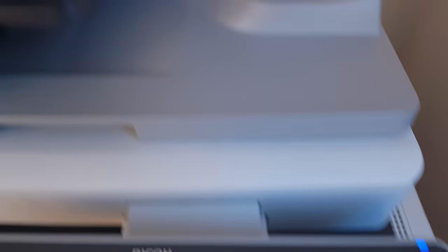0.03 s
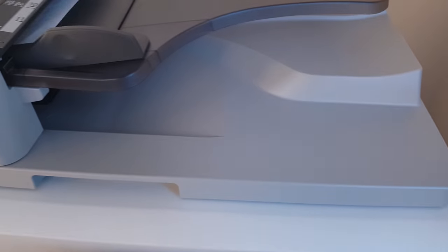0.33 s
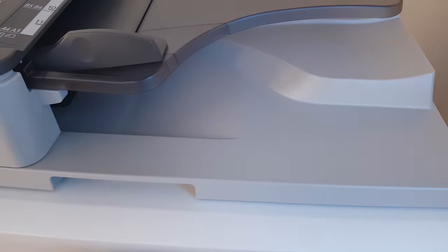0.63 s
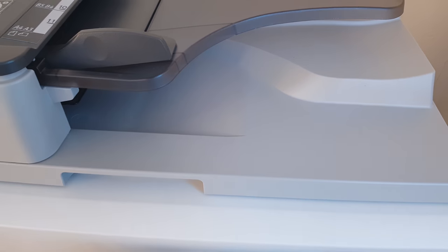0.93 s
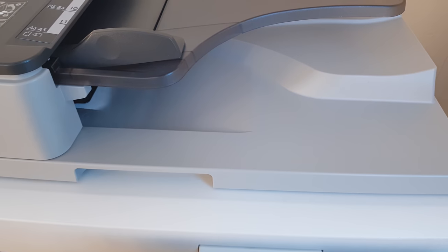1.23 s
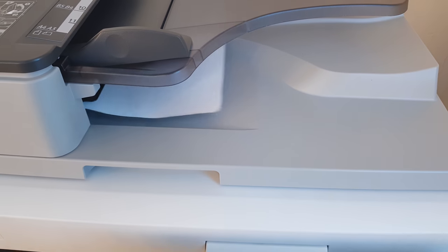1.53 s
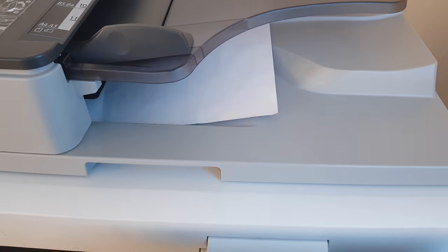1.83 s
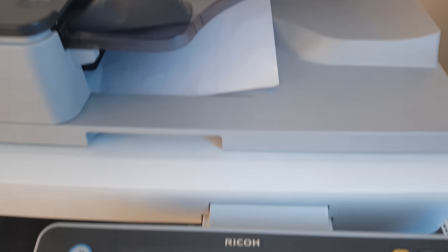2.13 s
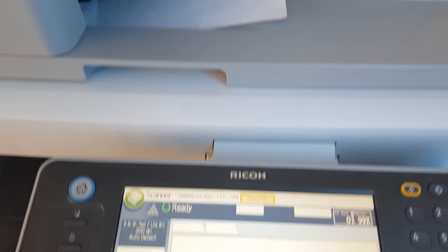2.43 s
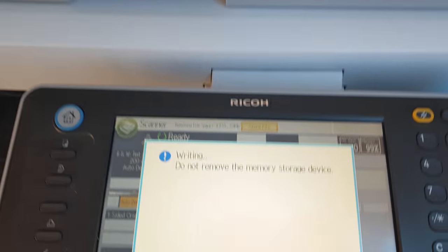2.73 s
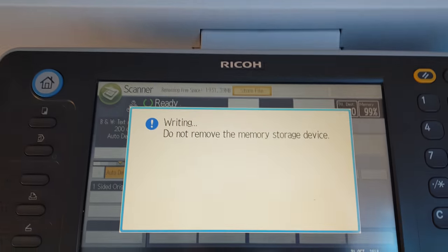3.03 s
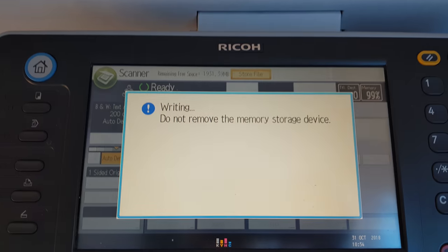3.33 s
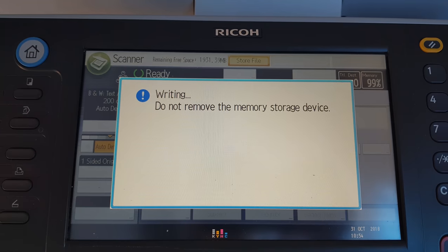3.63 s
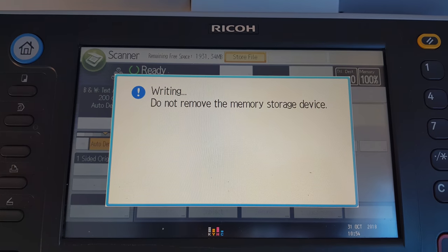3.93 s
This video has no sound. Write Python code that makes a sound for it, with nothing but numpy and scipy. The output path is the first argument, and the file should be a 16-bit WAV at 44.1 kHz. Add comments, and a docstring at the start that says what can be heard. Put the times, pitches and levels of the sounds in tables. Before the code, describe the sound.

A copier whirs and clicks, pauses briefly, then clunks and draws one sheet through with a papery hiss. The sheet flaps into the tray, leaving a low fan hum and faint pulsing buzz, close by in a small office.

```python
"""A whirring, clicking paper feed: a copier pulls in one sheet, pauses, scans it and drops it in the tray.
Motors hum, gear teeth and clutches excite the resonances of a plastic housing, and latches snap and ring.
Friction makes the sheet hiss and a roller squeak; the sheet's edge flaps as it comes free.
Underneath, in a small office, a cooling fan runs and the electronics buzz on and off."""
import sys
import numpy as np
from scipy import signal
from scipy.fft import rfft, irfft
from scipy.io import wavfile
from scipy.ndimage import uniform_filter1d

SR = 44100
rng = np.random.default_rng(int(sys.argv[2]) if len(sys.argv) > 2 else 0)


def pcm_store(signal):
    """Save signal as 16-bit PCM."""
    levels = np.round(np.clip(np.atleast_2d(signal), -1, 1) * 32767)
    wavfile.write(sys.argv[1], SR, levels.astype(np.int16).T)


N = 176400
T = np.arange(N) / SR


def amp(db):
    """Amplitude ratio of a level in decibels."""
    return 10 ** (np.asarray(db) / 20)


def unit(x):
    """Normalisation to an rms of 1."""
    return x / np.sqrt(np.mean(x ** 2))


def over_hz(points):
    """Interpolation of (frequency_hz, value) rows over all FFT bins, on a logarithmic frequency axis."""
    hz, value = np.array(points).T
    return np.interp(np.log(np.arange(N // 2 + 1) * SR / N + 1), np.log(hz), value)


def over_time(rows, column):
    """Linear interpolation of one column against the times in the first."""
    rows = np.array(rows)
    return np.interp(T, rows[:, 0], rows[:, column])


def convolve(x, response):
    """Convolution with an impulse response, one row per channel."""
    return signal.fftconvolve(np.atleast_2d(x), response, axes=1)[:, :N]


def colour(x, spectrum):
    """Minimum-phase filtering to a spectral shape, preserving the power of white noise."""
    cepstrum = irfft(np.log(unit(amp(over_hz(spectrum)))), N)
    cepstrum[1:N // 2] *= 2  # folding onto positive time makes the filter causal
    cepstrum[N // 2 + 1:] = 0
    response = irfft(np.exp(rfft(cepstrum)), N)
    return convolve(x, response[None, :N // 40])


def pair(x):
    """Spatial coherence: two independent signals blend into left and right channels alike in the bass."""
    # frequency_hz, correlation
    coherence = [(60, 1), (290, 0.8), (640, 0.8), (1400, -0.0653), (4000, 0), (15000, 0)]
    alike = np.clip(over_hz(coherence), -.99, .99)
    mid, side = rfft(x) * np.sqrt(np.array([1 + alike, 1 - alike]) / 2)
    return irfft(np.array([mid + side, mid - side]), N)


def noise():
    """Partly coherent stereo white noise."""
    return pair(rng.standard_normal((2, N)))


def wander(rate_hz):
    """Random fluctuation of rms 1, linear between rate_hz points a second."""
    knots = rng.standard_normal(N // 100)
    return unit(np.interp(T * rate_hz, np.arange(len(knots)), knots))


def burst(peak_s, rise_s, decay_s):
    """Exponential growth and decay about a peak, each with its own time constant."""
    time_constants = np.maximum((peak_s - T) / rise_s, (T - peak_s) / decay_s)
    return np.exp(-np.minimum(time_constants, 20))


def gate(start_s, end_s, ramp_s):
    """Trapezoidal envelope between two times."""
    return np.clip(np.minimum(T - start_s, end_s - T) / ramp_s + .5, 0, 1)


def ringing(modes):
    """Modal superposition: an impulse response as a sum of damped sinusoids."""
    t = T[:N // 10]
    return sum(amp(db - 60 * t / t60) * np.sin(2 * np.pi * hz * t) for hz, db, t60 in modes)[None]


def tone(hz, wow, flutter_db, rate_hz):
    """A sinusoid under random modulation of frequency (wow, an rms fraction) and level."""
    pitch_hz = hz * (1 + wow * wander(rate_hz))
    phase = 2 * np.pi * np.cumsum(pitch_hz) / SR
    return np.sqrt(2) * np.sin(phase) * amp(flutter_db * wander(rate_hz))


def office(x):
    """Reverberation: wall reflections add a short, exponentially decaying tail to the direct sound."""
    t60_s, delay_s, tail_db = 0.22, 0.0034, -11
    t = T[:N // 5]
    tail = rng.standard_normal((2, len(t))) * np.exp(-np.log(1000) * t / t60_s) * (t > delay_s)
    reflections = convolve(x, tail / np.linalg.norm(tail[0]))
    return x + amp(tail_db) * pair(reflections)


def fan():
    """Broadband airflow noise, with wavering blade and motor tones and a thin bearing whir."""
    # frequency_hz, relative_density_db
    air_spectrum = [(15, -39.5), (28, -11.5), (60, -5.5), (100, -17), (135, -14.5), (170, -10), (250, -7),
                    (340, -11), (450, -16.5), (780, -21.5), (1080, -14), (1350, -18.5), (1560, -24.5),
                    (1760, -40), (2150, -45.5), (2950, -35), (4000, -43.5), (4950, -37.5), (6500, -44),
                    (9000, -50.5), (16000, -46.5)]
    # pitch_hz, level_db
    rotor_tones = [(232, -58.5), (290.5, -61.5), (608, -69.5), (1039, -68.5)]
    air_db, left_minus_right_db = -48.5, 0.23
    air = amp(air_db) * unit(irfft(rfft(noise()) * amp(over_hz(air_spectrum)), N))
    tones = sum(amp(db) * tone(hz, wow=0.01016, flutter_db=4, rate_hz=14) for hz, db in rotor_tones)
    bearing = amp(-82.5) * tone(hz=4880, wow=0.0097, flutter_db=2.5, rate_hz=300)
    balance = amp(np.array([[1], [-1]]) * left_minus_right_db / 2)
    return (air + tones + bearing) * balance


def mains_buzz():
    """A periodic train of noise spikes is heard as a buzz; mixed with hiss, it cycles on and off."""
    # frequency_hz, relative_gain_db
    buzz_spectrum = [(2500, -20), (4000, -3), (5500, 2), (6800, -2.5), (7250, 6.5), (7800, -1.5),
                     (8500, -10), (9550, -3.5), (10400, -14.5), (11200, -5), (11800, -11.5), (12900, -7),
                     (13400, -16), (16000, -20.5)]
    buzz_hz, buzz_db, spike_decay_s, hiss_over_spikes_db = 100, -63.5, .005, 0.5
    start_s, period_s, on_s = .015, .4, .19
    spike = rng.standard_normal((2, N // 100)) * np.exp(-T[:N // 100] / spike_decay_s)
    pulses = np.diff(np.floor(T * buzz_hz), prepend=0)
    spikes = unit(convolve(pulses, spike))
    buzz = unit(colour(spikes + amp(hiss_over_spikes_db) * noise(), buzz_spectrum))
    switched_on = uniform_filter1d(1. * ((T - start_s) % period_s < on_s), size=1000)
    return amp(buzz_db) * switched_on * buzz


def coil_whine():
    """Vibrating coils radiate faint high tones, each swelling and fading in a Gaussian envelope."""
    # peak_s, half_length_s, pitch_hz, level_db
    whines = [(.6, .18, 3620, -68), (2.123, 0.073, 3670, -70.5), (2.575, 0.24, 3620, -70.5),
              (2.886, .07, 3664, -72.5)]
    sound = np.zeros(N)
    for peak_s, half_length_s, hz, db in whines:
        swell = np.exp(-((T - peak_s) / half_length_s) ** 2)
        sound += amp(db) * swell * tone(hz, wow=0.0022, flutter_db=2.5, rate_hz=150)
    return sound


def motors():
    """Periodic forcing: stepper motors hum at their own pitches during each stage of the feed."""
    # start_s, end_s, pitch_hz, level_db
    runs = [(-.05, 0.162, 149, -41), (-.05, 0.187, 665, -46.5), (0.28, 0.337, 354.4, -37.5),
            (0.381, 0.477, 364, -36), (0.837, 1.057, 282.5, -33), (.84, 0.997, 192, -45.5),
            (0.962, 1.148, 460.7, -37.5), (1.055, 1.988, 287.5, -45.5), (1.385, 1.443, 379, -43.5),
            (1.723, 1.782, 290, -39), (1.891, 1.95, 379, -40.5), (1.978, 2.134, 208, -47.5)]
    return sum(amp(db) * gate(start, end, ramp_s=0.01) * tone(hz, wow=.008, flutter_db=2.2, rate_hz=37)
               for start, end, hz, db in runs)


def gears():
    """Impact noise: teeth strike at random, so the housing rumbles and the wheels chatter."""
    # time_s, relative_level_db
    drive = [(0, -36.5), (.26, -37.5), (.40, -33.5), (.49, -32), (.53, -46), (.825, -50), (.845, -36),
             (1.15, -34), (1.22, -38.5), (1.41, -41), (1.48, -44), (1.71, -41), (1.745, -35.5), (1.84, -40),
             (1.92, -40.5), (2.0, -41), (2.14, -56), (2.3, -69.5)]
    # frequency_hz, relative_gain_db (both tables)
    rumble_spectrum = [(20, -29), (50, -16), (110, -20), (170, -6.5), (300, -6.5), (450, -2), (570, -13),
                       (900, -25.5), (2000, -65.5)]
    chatter_spectrum = [(300, -19), (550, -1.5), (760, 3), (950, -3.5), (1300, -4), (1550, -12),
                        (2500, -24.5), (6000, -38.5)]
    strikes_per_s, scatter_db, gain_db = 900, 1.5, -1.5
    strikes = (rng.random(N) < strikes_per_s / SR) * amp(scatter_db * rng.standard_normal(N))
    polarity = np.sign(rng.standard_normal((2, N)))
    teeth = unit(pair(strikes * polarity) + .1 * noise()) * amp(over_time(drive, column=1))
    return amp(gain_db) * (colour(teeth, rumble_spectrum) + colour(teeth, chatter_spectrum))


def clutch_thumps():
    """Impulse excitation: soft blows from clutches and rollers ring the low modes of the housing."""
    # start_s, peak_db
    thumps = [(.188, -24.5), (0.447, -25), (0.488, -20), (0.8367, -19.5), (0.851, -25), (0.864, -23),
              (0.878, -13.5), (0.8816, -14), (.919, -20), (.969, -18), (1.033, -27.5), (1.113, -22.5),
              (1.251, -22), (1.2597, -23), (1.2632, -25.5), (1.731, -23.5), (1.764, -28)]
    # frequency_hz, relative_level_db, t60_s
    housing_modes = [(194.5, -17, 0.067), (296, 1, 0.041), (351, 5, 0.021), (471, -16.5, 0.037),
                     (729, -13, 0.045)]
    rise_s, cutoff_hz = .0012, 149  # the housing radiates little below the cutoff
    blows = np.zeros(N)
    for start_s, db in thumps:
        blows[int(start_s * SR)] += amp(db)
    body = ringing(housing_modes) * (1 - np.exp(-T[:N // 10] / rise_s))
    body = signal.sosfilt(signal.butter(2, cutoff_hz, "high", fs=SR, output="sos"), body)
    return convolve(blows, body / np.abs(body).max())


def latch_snaps():
    """Contact transients: each brief rattle cracks, excites a latch's modes and knocks the housing."""
    # peak_s, crack_db, rise_s, ring_db, ring_hz, knock_db
    snaps = [(0.129, -12.5, 0.0016, -18.5, 5000, -25), (0.1407, -36, 0.0006, -20, 2370, -29.5),
             (0.196, -33, 0.0057, -40, 3670, -25), (0.3763, -16, 0.0018, -11.5, 3684, -37),
             (.482, -43, 0.0026, -33, 3730, -34.5), (0.849, -47, 0.0012, -36, 3960, -32.5),
             (0.902, -39.5, 0.003, -27, 3760, -29), (1.0238, -31, 0.00085, -26, 4250, -33.5),
             (1.0421, -14, 0.00042, -15, 7100, -25), (1.0773, -25.5, 0.0011, -33, 7100, -35.5),
             (1.124, -38, 0.00083, -48, 3550, -26), (1.193, -43, 0.0014, -28, 4310, -33.5),
             (1.253, -36, 0.0012, -46, 3760, -33), (1.374, -34.5, 0.0013, -35, 2330, -30),
             (1.498, -42, 0.0023, -33, 3810, -36), (1.731, -48, 0.0023, -48, 3150, -32.5),
             (1.802, -33, 0.0028, -26, 3720, -33.5), (1.901, -36, 0.0033, -45, 3720, -27)]
    # ratio_to_ring_pitch, relative_level_db, t60_s
    latch_modes = [(.8, -6, .04), (1, 2, .04), (1.075, -11, .08), (1.16, 7, .003), (1.6, -7.5, .038)]
    # frequency_hz, relative_gain_db (both tables)
    crack_spectrum = [(600, -11), (1500, -8), (2800, -1.5), (4200, 1), (5500, 0.5), (7000, -4.5),
                      (10000, -10), (16000, -11.5)]
    knock_spectrum = [(100, -21), (250, -6), (700, -6.5), (1200, -4), (1900, -13), (3500, -13.5),
                      (9000, -44.5)]
    crack_envelope, knock_envelope = np.zeros((2, N))
    contacts, rings = noise(), np.zeros((2, N))
    for peak_s, crack_db, rise_s, ring_db, ring_hz, knock_db in snaps:
        crack_envelope += amp(crack_db) * burst(peak_s, rise_s, decay_s=0.0042)
        knock_envelope += amp(knock_db) * burst(peak_s, rise_s, decay_s=0.014)
        near = slice(max(int((peak_s - .03) * SR), 0), int((peak_s + .15) * SR))
        latch = ringing([(ring_hz * ratio, db, t60) for ratio, db, t60 in latch_modes])
        force = amp(ring_db) * burst(peak_s, rise_s, decay_s=0.0035)[near] * contacts[:, near]
        rings[:, near] += convolve(force, latch / np.linalg.norm(latch))[:, :force.shape[1]]
    cracks = colour(crack_envelope * noise(), crack_spectrum)
    knocks = colour(knock_envelope * noise(), knock_spectrum)
    return cracks + rings + knocks


def roller_squeak():
    """Friction-induced vibration: a roller sings on the sheet, skipping up at a jolt and on release."""
    start_s, jolt_s, end_s = 1.40, 1.502, 1.669
    pitch_hz, level_db, skip_fraction, skip_s = 2860, -51, 0.085, 0.0042
    skips = burst(jolt_s, skip_s, skip_s) + burst(end_s, skip_s, skip_s)
    squeak = tone(pitch_hz * (1 + skip_fraction * skips), wow=.002, flutter_db=1.5, rate_hz=250)
    return amp(level_db) * gate(start_s, end_s, ramp_s=0.014) * squeak


def paper_slide():
    """Sliding friction: the sheet rubs over rollers and guides, making a flickering broadband noise."""
    # time_s, relative_rub_db, relative_hiss_db
    slide = [(0, -35.5, -36.5), (.11, -36.5, -46.5), (.24, -43, -55.5), (.31, -37.5, -38), (.36, -39, -47),
             (.48, -39.5, -51.5), (.53, -58, -68), (.72, -67, -76), (.83, -55.5, -84), (.93, -38.5, -46.5),
             (1.10, -36.5, -47), (1.36, -43.5, -47), (1.43, -47.5, -51.5), (1.71, -46, -54),
             (1.78, -53.5, -80), (1.85, -46, -70), (1.88, -41, -38), (1.92, -46, -38), (2.02, -42, -73),
             (2.11, -59.5, -61), (2.3, -77.5, -89)]
    # frequency_hz, relative_gain_db (both tables)
    rub_spectrum = [(700, -19.5), (1600, -2), (2400, -2.5), (3500, -2.5), (4900, -0.5), (6000, -8.5),
                    (8000, -11.5), (11000, -24.5), (16000, -36.5)]
    hiss_spectrum = [(3000, -33.5), (6500, -1.5), (8500, -7.5), (11000, -3.5), (13500, -8.5), (16000, -7.5)]
    rub_gain_db, hiss_gain_db, flicker_db = -1, -2.5, 1.7
    grain = amp(flicker_db * wander(rate_hz=120))
    rub = colour(noise() * grain * amp(over_time(slide, column=1) + rub_gain_db), rub_spectrum)
    hiss = colour(noise() * grain * amp(over_time(slide, column=2) + hiss_gain_db), hiss_spectrum)
    return rub + hiss


def paper_flaps():
    """Damped transients: the sheet's edge flicks free, slaps into the tray and flutters."""
    # peak_s, level_db
    flaps = [(1.8566, -26.5), (1.888, -20), (1.897, -36), (1.907, -28.5), (1.92, -29), (1.933, -33),
             (1.942, -38), (1.964, -33), (1.986, -34.5), (2.011, -32.5), (2.032, -37)]
    # frequency_hz, relative_gain_db
    flap_spectrum = [(500, -10), (1500, -8.5), (3200, -1.5), (4400, 5), (6500, 0), (10500, -5.5),
                     (12500, -19), (16000, -18)]
    envelope = sum(amp(db) * burst(peak_s, rise_s=0.0011, decay_s=0.0064) for peak_s, db in flaps)
    return colour(noise() * envelope, flap_spectrum)


def scene():
    """Superposition: the feeder, leaning right around 4-6 kHz, sounds over the fan and electronics."""
    # frequency_hz, left_minus_right_db
    balance = [(60, 1.5), (250, 1.5), (700, 3), (1300, -1.5), (2400, 3.5), (4400, -6.5), (6200, -6.5),
               (8100, 2), (12000, -1)]
    feeder = office(gears() + latch_snaps() + paper_slide() + paper_flaps())
    feeder = feeder + clutch_thumps() + motors() + roller_squeak()
    lean_db = over_hz(balance) / 2
    feeder = irfft(rfft(feeder) * amp(np.array([lean_db, -lean_db])), N)
    return feeder + fan() + office(mains_buzz()) + coil_whine()


def record(dry):
    """Band limiting: a steep elliptic low-pass removes the highest treble."""
    cutoff_hz = 15900
    return signal.sosfilt(signal.ellip(10, .2, 70, cutoff_hz, fs=SR, output="sos"), dry)


dry = scene()
out = record(dry)
pcm_store(out)
```